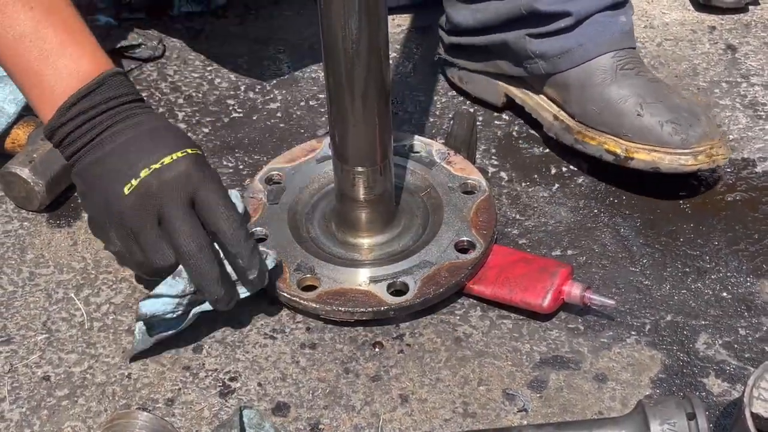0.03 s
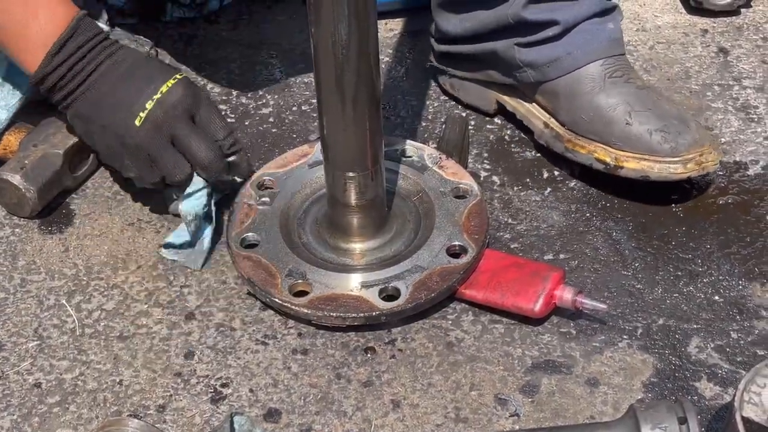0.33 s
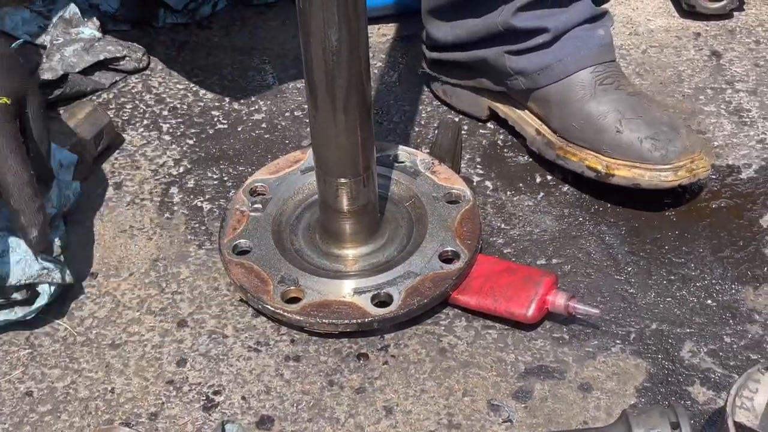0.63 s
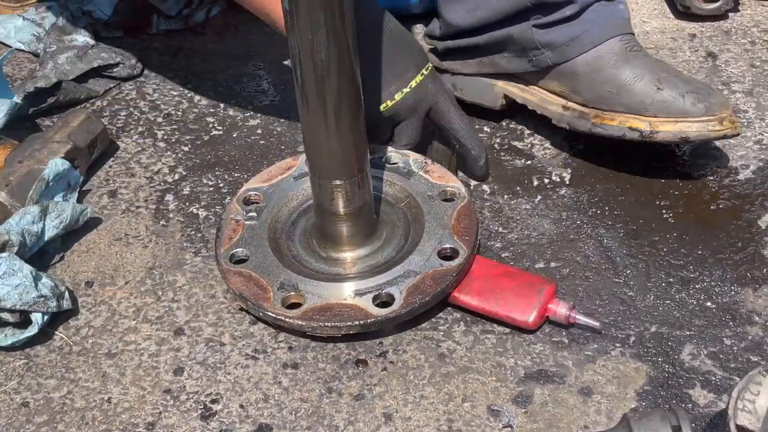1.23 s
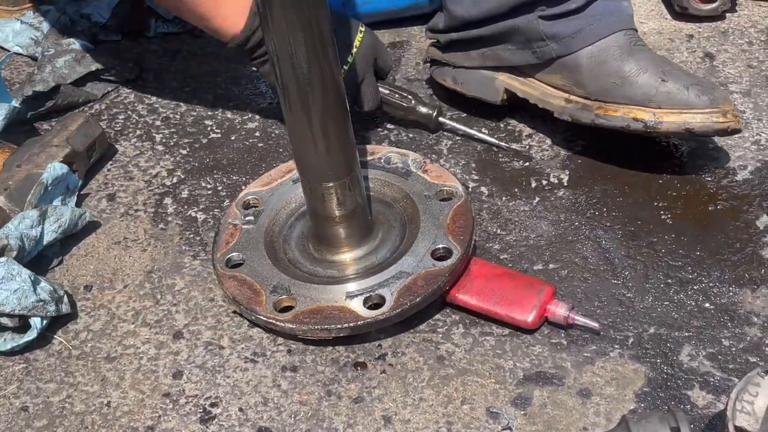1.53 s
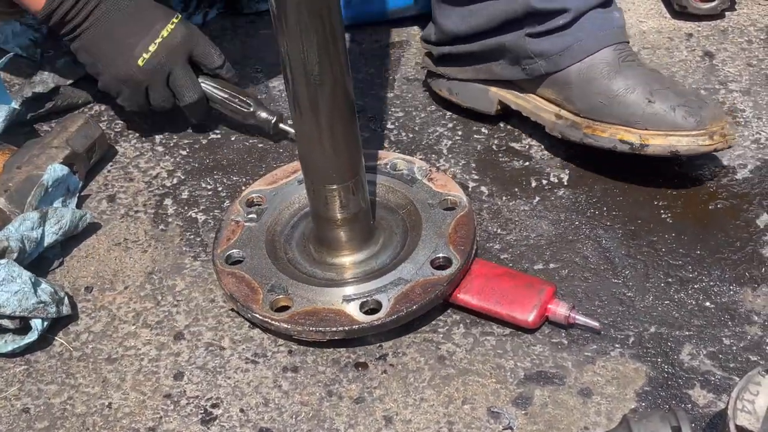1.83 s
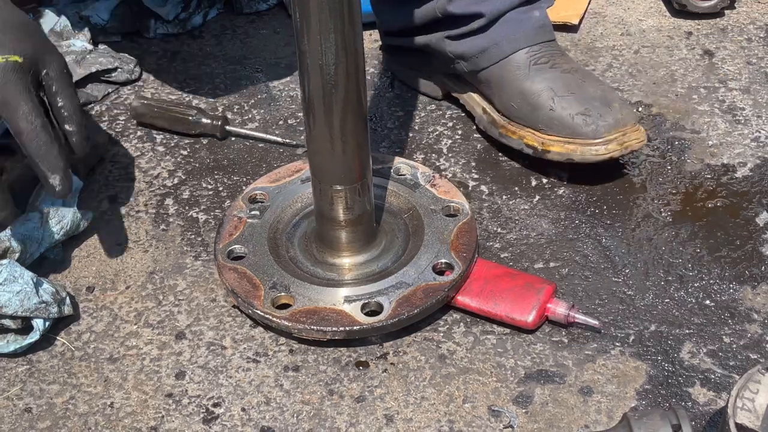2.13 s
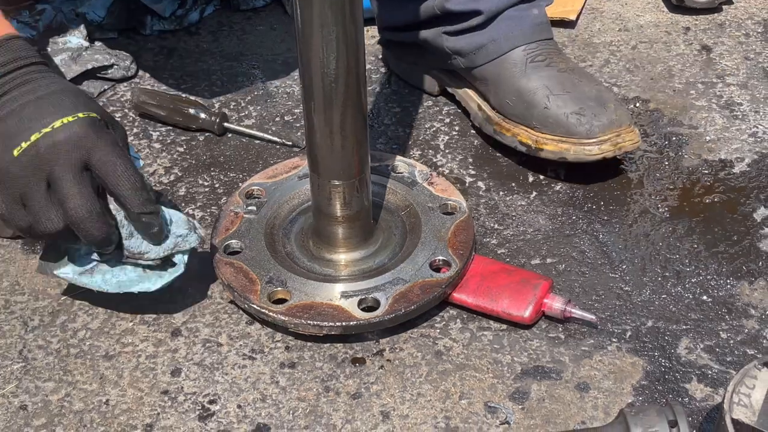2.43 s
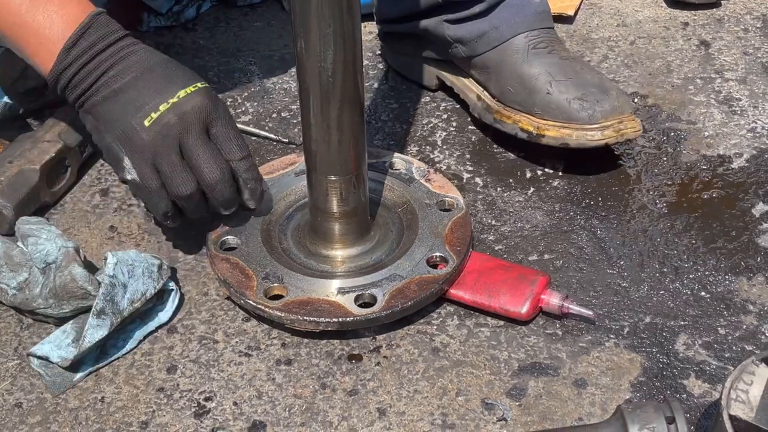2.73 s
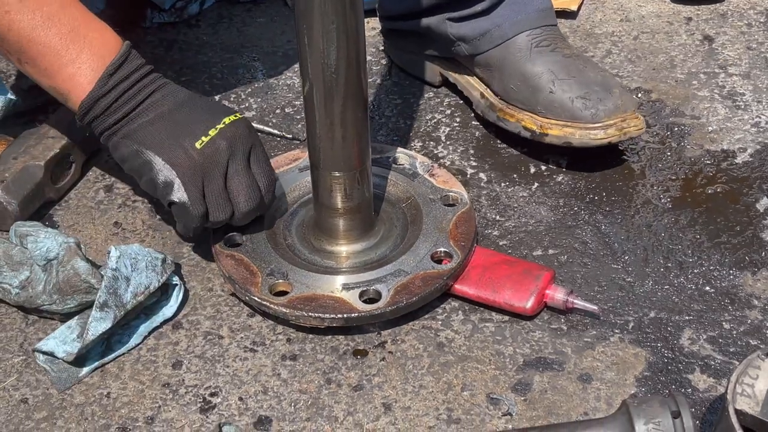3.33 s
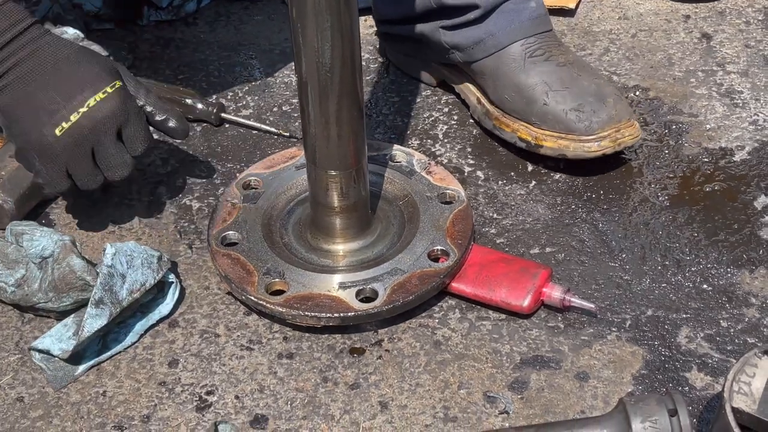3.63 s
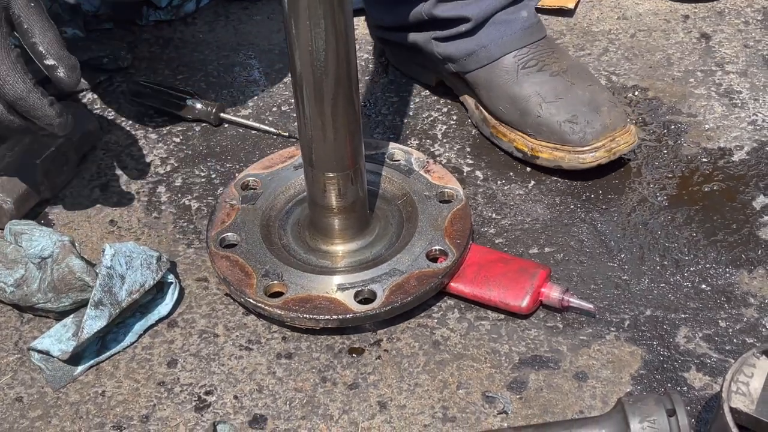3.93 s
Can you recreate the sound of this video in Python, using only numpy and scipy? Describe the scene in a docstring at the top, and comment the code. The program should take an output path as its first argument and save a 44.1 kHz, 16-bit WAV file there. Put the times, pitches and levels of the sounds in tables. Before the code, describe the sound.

Close, soft rubbing on a steel flange, first with a cloth and later with a glove that makes it ring faintly. In between, a boot scuffs and a screwdriver ticks and scrapes on gritty concrete. Traffic rumbles far away.

```python
"""Outdoors on gritty concrete, over distant traffic, a gloved hand wipes a steel axle flange (a rim)
with a rag, and the steel rings faintly. After a second come a soft knock and a boot scuff, and a hiss
heard from the start dies away. A screwdriver ticks as it is picked up, scrapes over grit and is laid
down. From two seconds on, the glove rubs the flange amid low bumps and twice makes it sing.
Near the end something squeals faintly, far away."""
import sys
import numpy as np
from scipy import signal
from scipy.fft import rfft, irfft
from scipy.io import wavfile
from scipy.ndimage import uniform_filter1d

SR = 44100
rng = np.random.default_rng(int(sys.argv[2]) if len(sys.argv) > 2 else 0)


def generate_wav(signal):
    """Clip the signal to [-1, 1] and save it as 16-bit WAV at the path in sys.argv[1]."""
    frames = np.transpose(np.atleast_2d(signal))
    scaled = np.clip(frames, -1, 1) * 32767
    pcm = np.round(scaled).astype(np.int16)
    wavfile.write(sys.argv[1], SR, pcm)


N = 176400
T = np.arange(N) / SR
FREQS = np.fft.rfftfreq(N, 1 / SR) + 1  # the extra 1 Hz avoids log(0)

# the blade's modes, the tones it rings at: f/Hz, relative level/dB, time to fade by 60 dB/s
BLADE_MODES = [(2570, -4, .05), (2715, -5, .07), (3130, -3, .028), (3300, -3, .028), (4500, -2, .055),
               (4872, -7, .03), (6280, -8, .025), (6900, -3, .028), (7370, -4, .028)]


def wipe(strokes, spectrum, grains, low_hz):
    """Rubbing makes noise and rings the flange; the spot touched favours low or high tones."""
    # the flange's tones: f/Hz, relative level/dB, time to fade by 60 dB/s
    flange_modes = [(1925, -10, .14), (2265, -1, .08), (2288, 0, .2), (2858, -10, .16), (3346, -9, .08),
                    (3539, -5, .18), (3810, -6, .18), (4235, -7, .16), (5117, -13, .12), (5880, -12, .12)]
    lowest_hz = flange_modes[0][0]
    rub = highpass(grains, low_hz)
    out = 0
    for start, length, attack, release, db, tilt, ring_db, ring_tilt in strokes:
        pressure = undb(db) * stroke(start, length, attack, release)
        modes = [(hz, gain + ring_tilt * np.log2(hz / lowest_hz), t60) for hz, gain, t60 in flange_modes]
        ringing = ring(pressure * grains, modes)
        out += pressure * unit(colour(rub, spectrum, tilt)) + undb(ring_db) * ringing
    return out


def rag():
    """Cloth slides over the steel with an even swish."""
    # strokes of rag and clothing: start/s, length/s, attack/s, release/s, level/dB,
    # tilt/(dB per octave), ring against rub/dB, ring tilt/(dB per octave)
    strokes = [(.085, 0.069, 0.032, 0.17, -40.5, 0.1, -18, 3),
               (.196, 0.036, 0.0066, 0.014, -48, -1.5, -2.5, -5),
               (.232, 0.042, 0.043, 0.0024, -40, 0, -36.5, -7),
               (1.95, 0.098, 0.019, 0.041, -42, 2.5, -28, -15)]
    # tone of the cloth: f/Hz, relative level/dB
    spectrum = [(400, -6), (750, -0.5), (1100, -5), (1800, 0.5), (2300, 1.5), (3200, 2), (4300, -0.5),
                (6000, 1), (8500, 2.5), (11500, -1.5), (13000, 1)]
    return wipe(strokes, spectrum, friction(spread_db=0, flutter_db=0), low_hz=397)


def glove():
    """The glove catches unevenly as it rubs the flange."""
    # glove strokes: same columns as in rag()
    strokes = [(2.08, 0.5, 0.026, 0.15, -76, 1.5, -21, 3), (2.395, 0.075, 0.013, 0.024, -61, -7, -30, 2),
               (2.705, 0.057, 0.0039, 0.15, -71, -5, -28, -2),
               (2.84, 0.031, 0.019, 0.044, -55.5, 1, -6.5, 12),
               (2.895, 0.057, 0.017, 0.072, -67.5, 3, -37, -10),
               (2.965, 0.048, 0.028, 0.036, -64, 1.5, -19, 0), (3.04, 0.091, 0.097, 0.13, -65, 2, -11, 0),
               (3.265, 0.088, 0.089, 0.041, -52, -1, -22, -10),
               (3.35, 0.052, 0.021, 0.022, -56, -2, -23, 17), (3.47, 0.017, 0.017, 0.036, -56, 2, -3, -1),
               (3.88, 0.16, 0.013, .05, -70, 5.5, -23, 0)]
    # tone of the glove: f/Hz, relative level/dB
    spectrum = [(700, 1.5), (1400, -5), (2400, 0.5), (3400, 0), (5000, 4), (6500, 2.5), (9000, -1.5),
                (11500, -4), (12800, -14.5)]
    return wipe(strokes, spectrum, friction(spread_db=2, flutter_db=2), low_hz=690)


def singing():
    """Steady rubbing keeps the flange's strongest tone sounding, with a slight waver."""
    # steady rubs: start/s, length/s, level/dB
    rubs = [(2.84, .16, -67), (3.31, .11, -68)]
    pitch_hz = 2286
    pressure = sum(undb(db) * stroke(at, length, attack=.02, release=.05) for at, length, db in rubs)
    return pressure * undb(2.5 * walk(40)) * np.sin(2 * np.pi * pitch_hz * T + .8 * walk(40))


def screwdriver():
    """Each contact cracks and rings the hand-damped blade; the spot touched favours some tones."""
    # ticks: t/s, level/dB, tilt/(dB per octave), relative ring level/dB, favoured f/Hz
    ticks = [(1.4297, -44.5, 5, -14, 4500), (1.482, -42.5, 4, 1, 3200), (1.5072, -47.5, 5, -3, 3200),
             (1.5352, -48.5, 0, -8, 3300), (1.6028, -44, -2, 1, 2700), (1.6585, -48, 0, -8, 3200),
             (1.6845, -49.5, 2, 3, 4500), (1.7535, -52, -3, -7, 3100), (1.895, -52.5, -2, -3, 3200),
             (1.9235, -47, -1, -2, 2730), (2.0888, -52, 5, 11.5, 2600)]
    # tone of the crack: f/Hz, relative level/dB
    spectrum = [(500, -61), (1400, -11), (2900, 12), (3600, 0.5), (4500, 11), (5700, -0.5), (7300, 3),
                (11000, -6.5), (12500, -51.5)]
    crack_s, grip_detune, scatter_db = .0017, .012, 2
    favour_db, favour_octaves = 5, .2
    out = np.zeros(N)
    noise = highpass(rng.standard_normal(N), 860)
    for at, db, tilt, ring_db, favoured_hz in ticks:
        modes = []
        for hz, gain, t60 in BLADE_MODES:
            gain += favour_db * np.exp(-(np.log2(hz / favoured_hz) / favour_octaves) ** 2)
            hz *= 1 + grip_detune * rng.standard_normal()
            modes.append((hz, gain + scatter_db * rng.standard_normal(), t60))
        blade = undb(ring_db - 9) * response(modes)
        span = slice(int(at * SR), int(at * SR) + len(blade))
        crack = 2 * np.exp(-T[:len(blade)] / crack_s) * unit(colour(noise, spectrum, tilt))[span]
        out[span] += undb(db) * (crack + blade)
    return out


def scrape():
    """Grit keeps the sliding blade faintly ringing."""
    grit = friction(spread_db=3, flutter_db=4)
    pressure = stroke(start=1.7, length=.19, attack=.03, release=.03)
    return undb(-68) * pressure * unit(ring(grit, BLADE_MODES))


def scuffs():
    """Boot, glove and tool drag over grit."""
    # scuffs: same columns as in rag()
    strokes = [(1.17, 0.13, 0.099, 0.041, -44, -1.5, -7.5, 11),
               (1.309, 0.11, 0.015, 0.22, -53.5, -1, -23, 2), (1.7, 0.19, 0.13, 0.12, -58.5, -1.2, -38, 0),
               (1.975, 0.075, 0.033, 0.06, -51.5, -8, -18, -2),
               (2.176, 0.035, 0.0013, 0.041, -51.5, -3.5, -14, -5)]
    # tone of the grit: f/Hz, relative level/dB
    spectrum = [(300, -2), (560, -2), (780, 1.5), (1000, -10), (1350, -4), (1850, -1.5), (2400, 0.5),
                (3700, 0), (5500, -2), (8000, 0.5), (11500, -4)]
    return wipe(strokes, spectrum, friction(spread_db=2, flutter_db=2), low_hz=310)


def taps():
    """Glove and tool handle make short, dull taps with no ring."""
    # taps: t/s, level/dB, tilt/(dB per octave)
    contacts = [(1.2735, -34, 1), (1.689, -47, 4), (3.511, -53, -2), (3.6068, -51, 0), (3.616, -57, 2)]
    spectrum = [(600, -8), (1400, 0), (3000, 1), (4200, -9), (7000, -24)]  # f/Hz, relative level/dB
    decay_s = .003
    noise = highpass(rng.standard_normal(N), 600)
    out = 0
    for at, db, tilt in contacts:
        fade = (T >= at) * np.exp(-np.abs(T - at) / decay_s)
        out += undb(db) * fade * unit(colour(noise, spectrum, tilt))
    return out


def knock():
    """A padded bump with a dull, short ring."""
    modes = [(395, 2, .051), (444, 0, .056)]  # same columns as BLADE_MODES
    push = stroke(start=1.135, length=.011, attack=.02, release=.018) * rng.standard_normal(N)
    return undb(-43) * ring(push, modes)


def bumps():
    """Handling makes soft thuds, each a brief swell of low noise an octave wide."""
    # soft pushes: start/s, length/s, centre f/Hz, level/dB
    pushes = [(2.225, .11, 118, -37.5), (2.42, .07, 145, -44), (2.845, .045, 145, -42),
              (2.92, .1, 100, -38)]
    out = np.zeros(N)
    for start, length, hz, db in pushes:
        band = signal.butter(3, [hz / np.sqrt(2), hz * np.sqrt(2)], "band", fs=SR, output="sos")
        span = slice(int(start * SR), int((start + length) * SR))
        thud = signal.sosfilt(band, rng.standard_normal(N))[span]
        out[span] += undb(db) * unit(thud * np.hanning(len(thud)))
    return out


def hiss():
    """An even, bright hiss that dies away."""
    # tone of the hiss: f/Hz, relative level/dB
    spectrum = [(500, 12), (1500, -12), (2500, 0), (4500, -0.5), (6800, 5), (9000, 5), (11500, 2),
                (12500, -2.5)]
    hold_s, fade_s = 1.41, .053
    fade = np.exp(-np.maximum(T - hold_s, 0) / fade_s)
    return undb(-56.5) * fade * unit(colour(rng.standard_normal(N), spectrum))


def squeal():
    """A faint, thin tone from far away."""
    swell = stroke(start=3.76, length=.21, attack=.023, release=.088)
    return undb(-74.5) * swell * tone(hz=2960, waver=.0083, rate=29.5)


def traffic():
    """Distant traffic in stereo: swelling rumble, road noise, an engine drone and faint machine hum."""
    # tone of the traffic: f/Hz, relative level/dB
    spectrum = [(20, -63), (35, -7), (48, -2.5), (75, 2), (105, 0.5), (150, -6), (200, -18), (340, -22),
                (450, -28), (700, -30.5), (1100, -37), (2200, -44), (3500, -50), (5500, -60),
                (11000, -73.5)]
    # stereo width: f/Hz, side against middle/dB
    width = [(30, -61), (60, -29.5), (125, -16), (250, -10), (500, -4), (1200, -2.5), (3000, -8),
             (10000, -13)]
    # swells of the rumble: t/s, relative level/dB
    rumble_swells = [(0.0, -47), (1.99, -47), (2.41, -40), (2.51, -48), (2.54, -41), (2.68, -46),
                     (2.99, -43.5), (3.05, -43.5), (3.46, -48.5), (3.49, -43.5), (3.8, -52), (3.97, -42.5)]
    # swells of the engine: t/s, relative level/dB
    drone_swells = [(0.0, -37), (0.19, -33.5), (0.62, -35), (0.68, -46.5), (0.97, -33.5), (1.1, -46),
                    (1.46, -33.5), (1.63, -42.5), (1.73, -35.5), (2.04, -42), (2.33, -28), (2.61, -56),
                    (2.65, -30), (2.88, -51), (3.11, -33.5), (4.0, -49.5)]
    # machine hum: f/Hz, level/dB
    hum_tones = [(352, -73), (420, -75), (600, -75)]
    split_hz, sine_peak = 226, np.sqrt(2)
    middle, side = (colour(rng.standard_normal(N), spectrum) for _ in range(2))
    side = colour(side, width)
    stereo = np.array([middle + side, middle - side])
    low = irfft(rfft(stereo) / (1 + (FREQS / split_hz) ** 8), N)
    rumble = unit(low) * undb(along_time(rumble_swells) + 6)
    road = unit(stereo - low) * undb(-56.5 + .13 * walk(16))
    drone = tone(hz=56.95, waver=.0356, rate=14) * undb(along_time(drone_swells) - 3 + 2 * walk(12.5))
    hum = sum(undb(db + 2 * walk(1.3)) * tone(hz, waver=.00391, rate=14) for hz, db in hum_tones)
    return rumble + road + sine_peak * (drone + hum)


def friction(spread_db, flutter_db, catches_per_s=5500):
    """Countless tiny catches over smooth noise; spread varies their size, flutter adds flurries."""
    catches = (rng.random(N) < catches_per_s / SR) * rng.standard_normal(N)
    catches *= undb(spread_db * np.minimum(rng.exponential(size=N), 5))
    rub = unit(catches) + 1.72 * rng.standard_normal(N)
    return unit(rub * undb(flutter_db * walk(107)))


def stroke(start, length, attack, release):
    """Pressure builds (attack) and, after length, lets go (release); all in seconds."""
    rise = np.clip((T - start) / attack, 0, 1) ** 1.41
    return rise * np.exp(-2 * np.maximum(T - start - length, 0) / release)


def response(modes):
    """The fading tones that follow one tap; each drops 60 dB in t60 seconds."""
    t = T[:SR // 3]
    return sum(undb(db) * np.sin(2 * np.pi * hz * t) * np.exp(-np.log(1000) * t / t60)
               for hz, db, t60 in modes)


def ring(force, modes):
    """Every little push starts the object's tones anew, and they add up."""
    one_tap = response(modes)
    return signal.oaconvolve(force, one_tap)[:N] / np.linalg.norm(one_tap)


def tone(hz, waver, rate):
    """A pure tone whose pitch wanders by about the fraction waver."""
    return np.sin(2 * np.pi * np.cumsum(hz * (1 + waver * walk(rate))) / SR)


def walk(rate):
    """A smooth random wobble of size about 1; a higher rate makes it quicker."""
    window = int(SR / rate)
    smoothed = uniform_filter1d(rng.standard_normal(N), window, mode="wrap")
    return unit(uniform_filter1d(smoothed, window, mode="wrap"))


def colour(x, spectrum, tilt=0):
    """Shape the tone of x; tilt adds that many dB per octave above 1000 Hz."""
    slope_db = tilt * np.log2(np.maximum(FREQS, 1000) / 1000)
    return irfft(rfft(x) * undb(along_hz(spectrum) + slope_db), N)


def highpass(x, hz):
    """Gently cut the bass."""
    return signal.sosfilt(signal.butter(2, hz, "high", fs=SR, output="sos"), x)


def along_hz(points):
    """Join a table's points on a log-frequency axis."""
    hz, value = np.array(points).T
    return np.interp(np.log(FREQS), np.log(hz), value)


def along_time(points):
    """Join a table's points over time."""
    return np.interp(T, *np.array(points).T)


def undb(db):
    """Turn decibels into a gain."""
    return 10 ** (np.asarray(db) / 20)


def unit(x):
    """Scale x to a typical size (standard deviation) of 1."""
    return x / (x.std() + 1e-12)


def scene():
    """The sounds reach two microphone openings slightly out of step, over the traffic."""
    # reflections from the ground: f/Hz, side against middle/dB
    ground_spectrum = [(800, -13), (2500, -12.5), (6000, -28.5), (12500, -10)]
    # how far the left opening is ahead: f/Hz, phase/rad
    left_lead = [(500, 0), (1050, .6), (1600, -.2), (3000, .45), (5000, .4), (6000, 0), (8000, .3),
                 (8800, 0), (9200, -1.4), (10250, -3.14), (11000, -4.5), (11900, -6.28), (12400, -6.4),
                 (13200, -7.6)]
    direct = rag() + glove() + scuffs() + screwdriver() + taps() + singing() + scrape()
    direct += knock() + bumps() + hiss() + squeal()
    echo_s = .0085
    echoes = rng.standard_normal(N // 100) * np.exp(-T[:N // 100] / echo_s)
    reflected = signal.fftconvolve(direct, echoes / np.linalg.norm(echoes))[:N]
    side = colour(reflected, ground_spectrum)
    right = irfft(rfft(direct) * np.exp(-1j * along_hz(left_lead)), N)
    return np.array([direct + side, right - side]) + traffic()


def record(dry):
    """The treble is lifted near 11 kHz and the very top is cut; the sound eases in and out."""
    # shape of the treble: f/Hz, gain/dB
    treble_shape = [(8500, -2.5), (10200, 2.5), (11400, 6), (12200, -6.5), (12900, -6.5), (13600, -60)]
    fade_s, top_hz = .01, 15800
    ease = np.minimum(np.minimum(T, T[::-1]) / fade_s, 1)
    lowpass = signal.ellip(8, .2, 70, top_hz, fs=SR, output="sos")
    return signal.sosfilt(lowpass, colour(ease * dry, treble_shape))


dry = scene()
out = record(dry)
generate_wav(out)
```